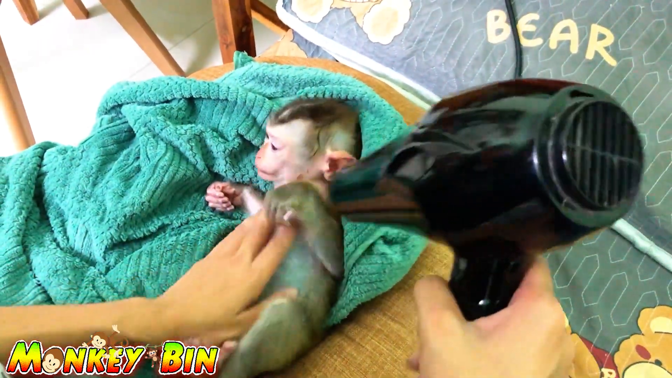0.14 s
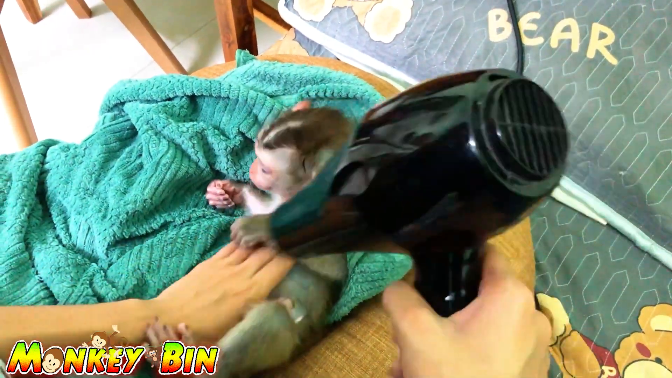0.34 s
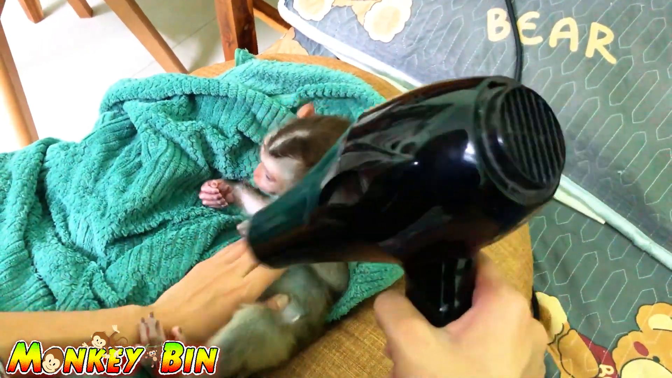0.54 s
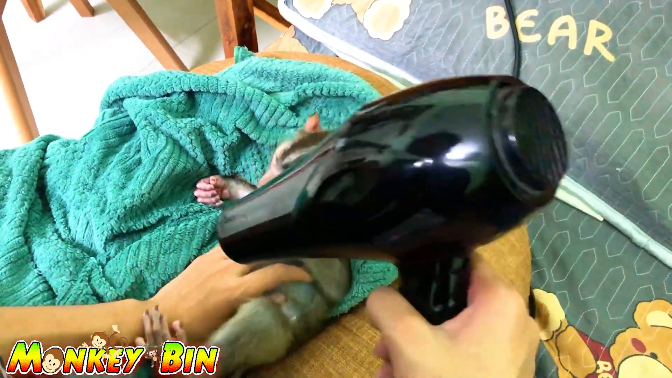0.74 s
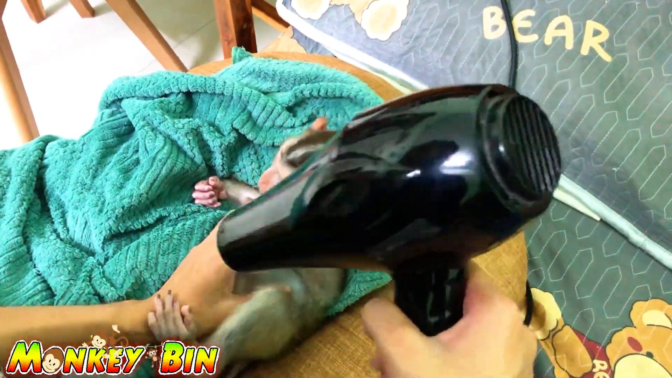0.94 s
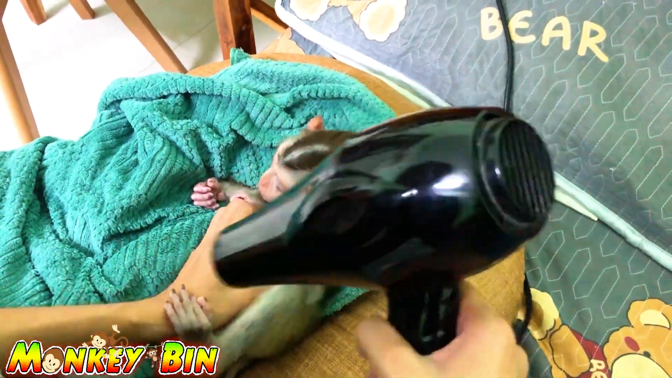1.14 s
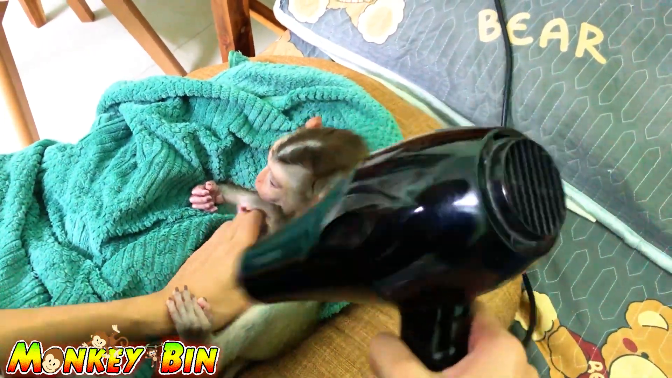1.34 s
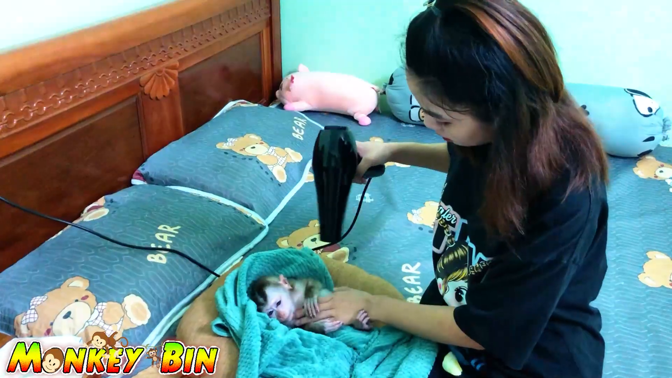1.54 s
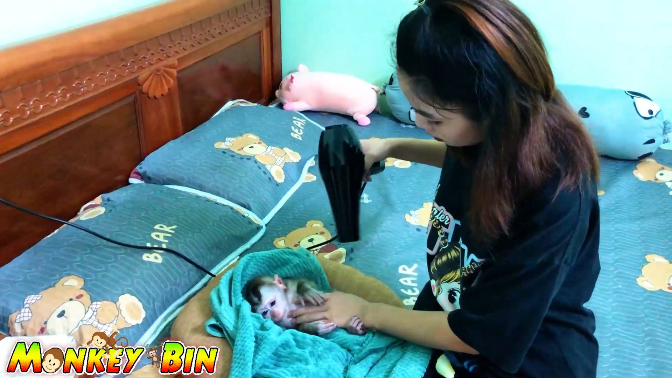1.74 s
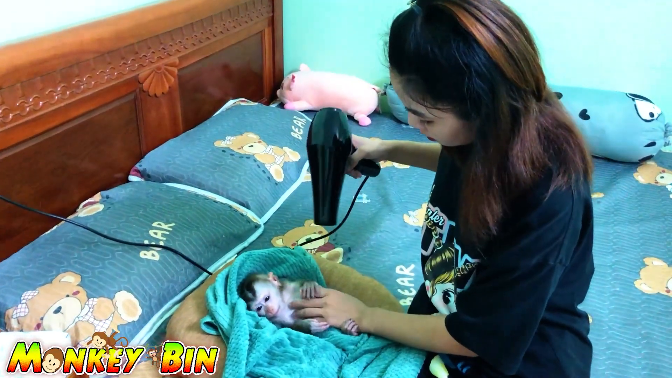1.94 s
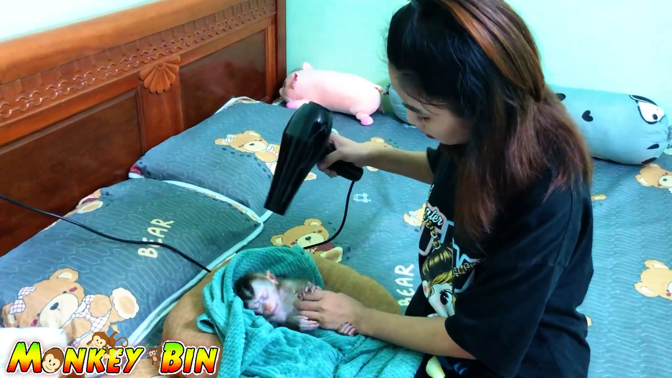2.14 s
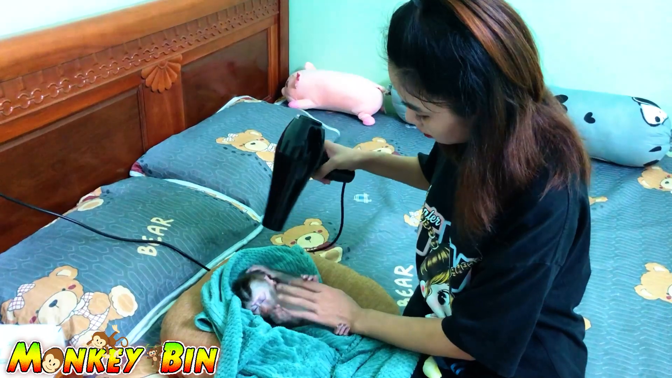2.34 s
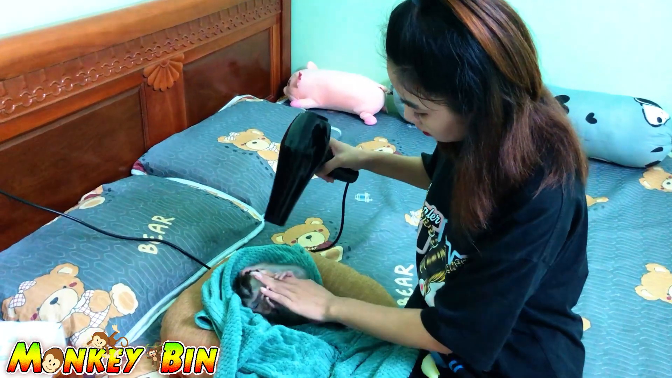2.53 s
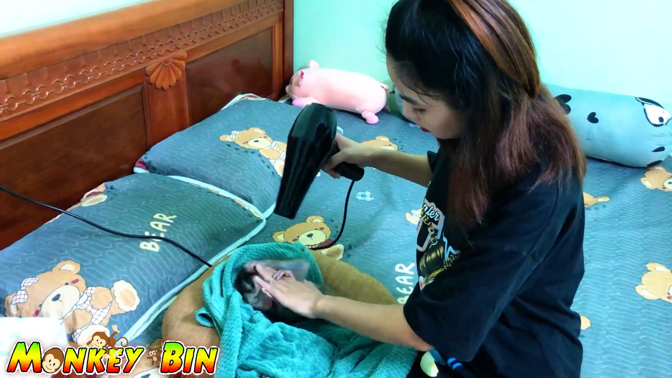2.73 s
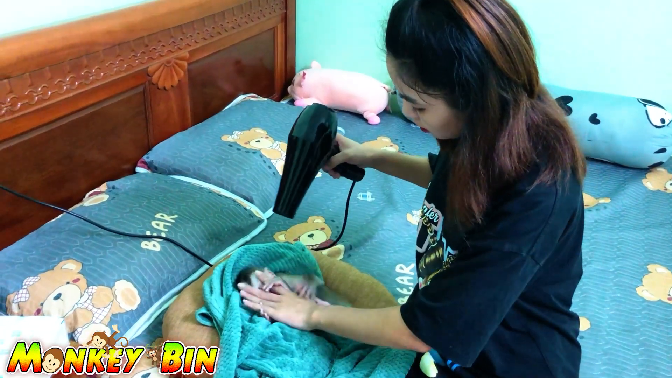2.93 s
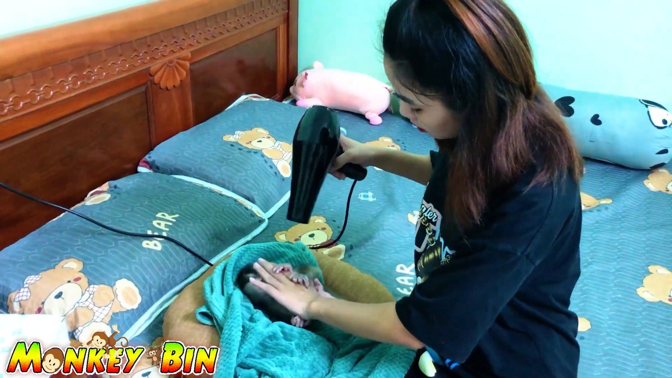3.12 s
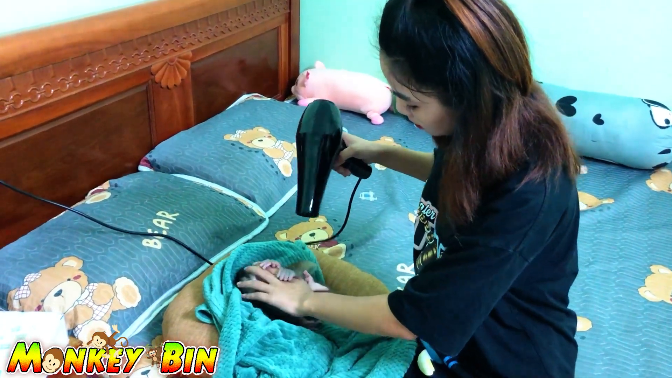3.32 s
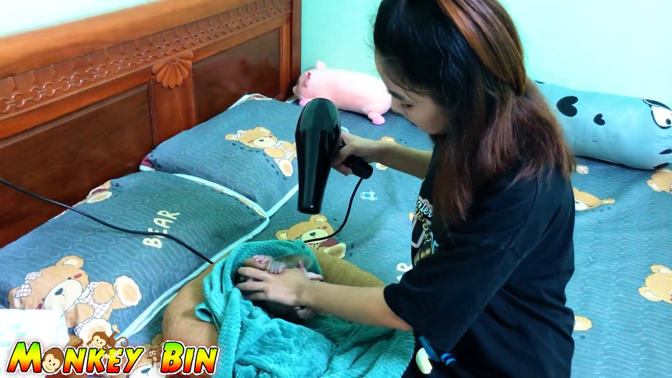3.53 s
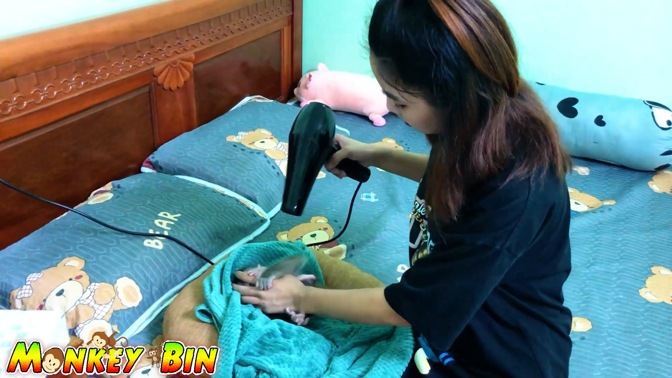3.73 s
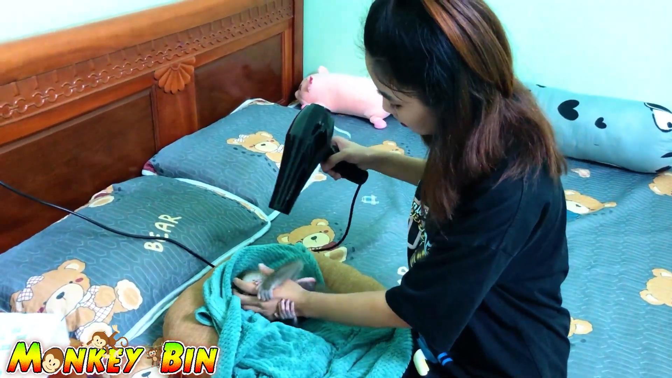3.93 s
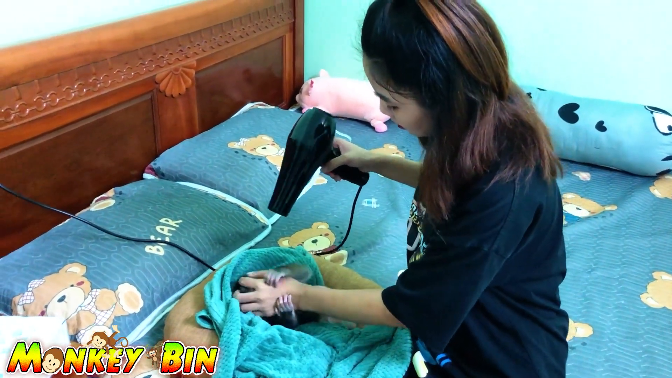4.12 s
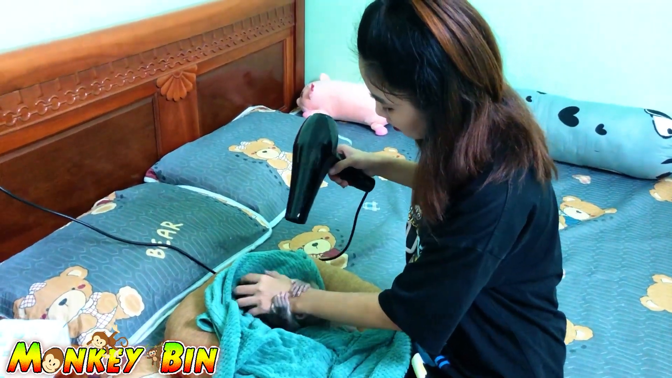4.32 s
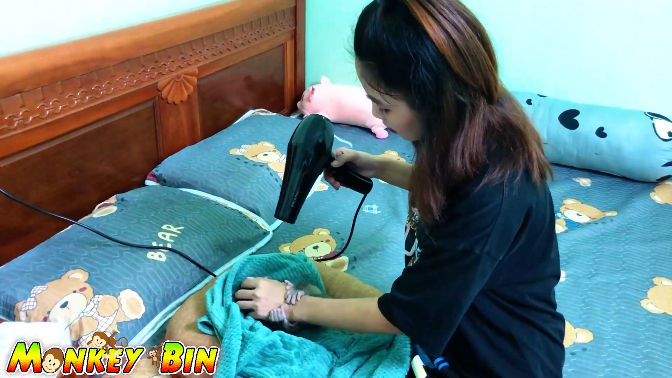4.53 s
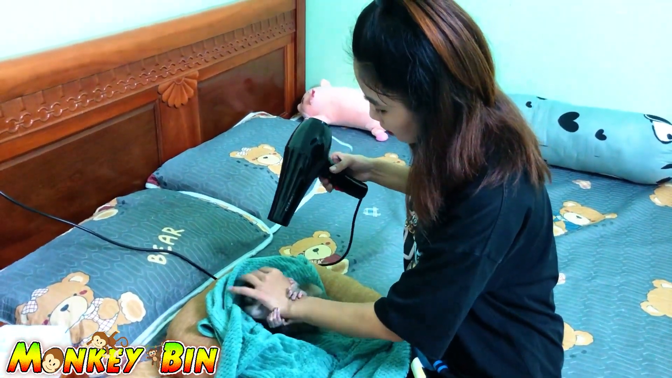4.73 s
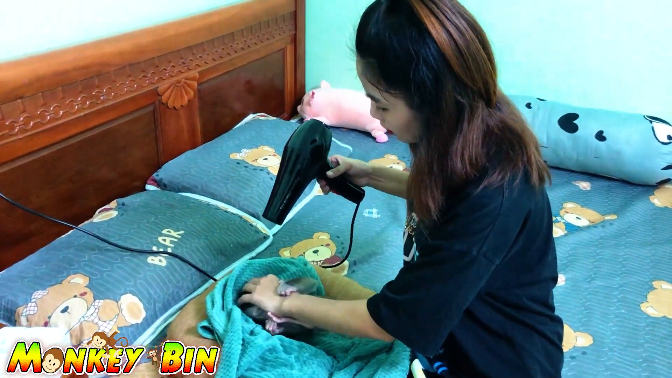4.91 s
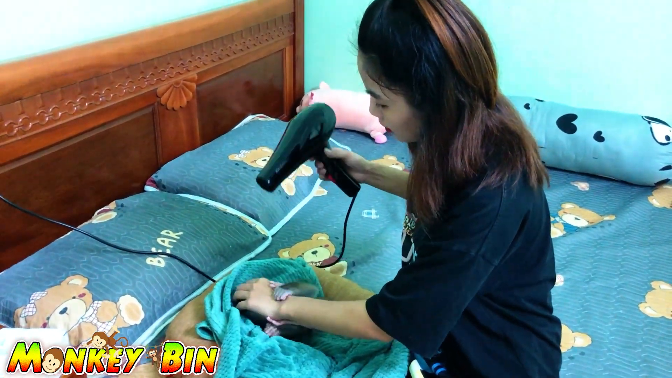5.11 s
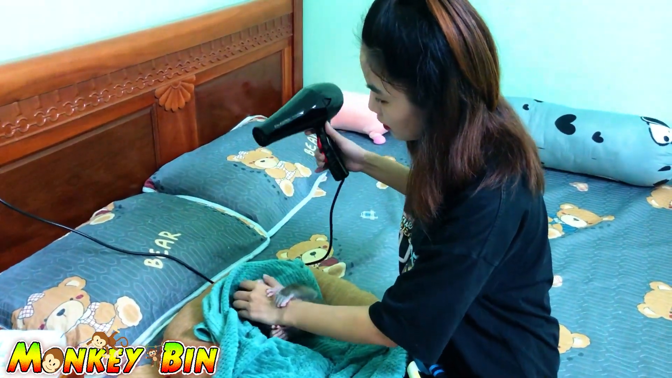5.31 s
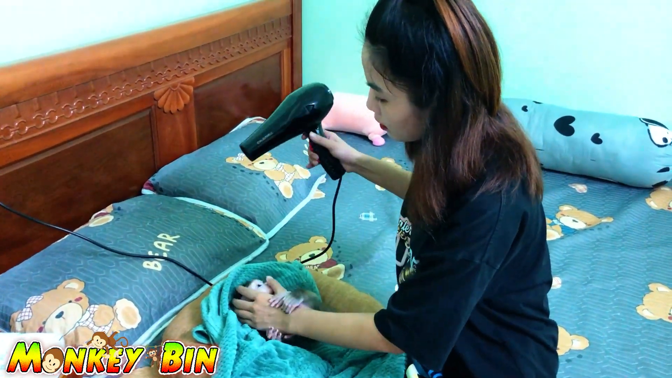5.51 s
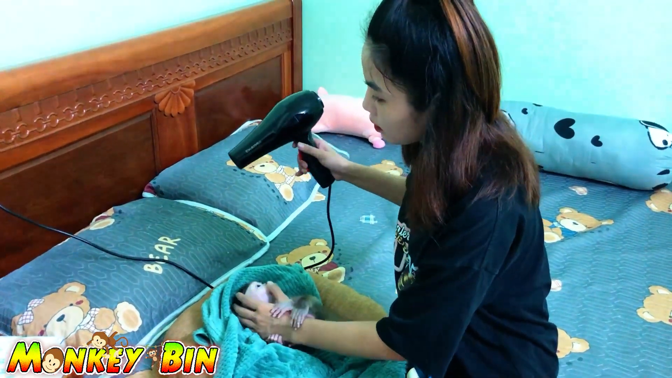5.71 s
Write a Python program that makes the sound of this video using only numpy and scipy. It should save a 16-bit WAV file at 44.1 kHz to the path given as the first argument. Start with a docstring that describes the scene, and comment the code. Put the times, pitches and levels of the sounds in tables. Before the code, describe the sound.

Rushing air from a hair dryer fills a small bedroom, with a slight wavering whine underneath. The microphone starts right beside the dryer, then suddenly sits farther away, where the tone is roomier. After almost five seconds the fan coasts down, falling in pitch and fading. Fingers shift softly on the plastic handle, and a switch clicks sharply once, ringing briefly in the quiet room.

```python
"""The rush of a handheld hair dryer fills a bedroom, close by its intake, then abruptly from across the bed.
Turbulent air rings the barrel over a faint fan whine, both swelling and dipping.
The power is cut: the fan coasts down, its whine sags and the hiss dies first.
Fingers slide on the plastic handle; short bursts of hiss and one sharp switch snap ring in the room."""
import sys
import numpy as np
from scipy import signal
from scipy.fft import rfft, irfft
from scipy.io import wavfile
from scipy.ndimage import uniform_filter1d

SR = 44100
rng = np.random.default_rng(int(sys.argv[2]) if len(sys.argv) > 2 else 0)


def wav_record(signal):
    """Record a signal, one row per channel, as 16-bit PCM in the file named by sys.argv[1]."""
    frames = np.transpose(np.atleast_2d(signal))
    bounded = np.clip(frames, -1, 1)
    # unit amplitude maps onto the largest positive 16-bit level
    quanta = np.round(bounded * 32767).astype(np.int16)
    wavfile.write(sys.argv[1], SR, quanta)


N = 254016
T = np.arange(N) / SR
FREQ = np.maximum(np.fft.rfftfreq(N, 1 / SR), 1)


def undb(db):
    """Decibels to gain."""
    return 10 ** (np.asarray(db) / 20)


def unit(x):
    """Scale to rms 1."""
    return x / np.sqrt(np.mean(x ** 2))


def slope(points):
    """Join (Hz, value) points on a log-frequency axis."""
    hz, value = np.transpose(points)
    return np.interp(np.log(FREQ), np.log(hz), value)


def bumps(modes):
    """Response in dB of a set of resonances and notches."""
    return sum(db / (1 + (2 * (FREQ - hz) / width) ** 2) for hz, width, db in modes)


def noise(db):
    """Noise of rms 1, coloured by a response in dB."""
    return unit(irfft(rfft(rng.standard_normal(N)) * undb(db), N))


def split(x, centres):
    """Overlapping bands round the centres that add up to x."""
    spectrum = rfft(x)
    return [irfft(spectrum * slope(list(zip(centres, row))), N) for row in np.eye(len(centres))]


def walk(rate_hz):
    """Slow random wander of rms 1."""
    return noise(-20 * np.log10(1 + (FREQ / rate_hz) ** 2))


def swell(x, db, hz, width_hz):
    """Ride one band of x up or down by a moving number of dB."""
    band = irfft(rfft(x) / (1 + (2 * (FREQ - hz) / width_hz) ** 4), N)
    return x + band * (undb(db) - 1)


def fan_speed(off_s=4.729, half_speed_s=0.5):
    """Share of full speed: air drag brakes the fan once the power is cut."""
    return 1 / (1 + np.maximum(T - off_s, 0) / half_speed_s)


def level_rides(far):
    """Rides in dB for whine, whistle, rumble and hiss: a base for each place, with swells and dips."""
    # Brief swells and dips. Each row: middle and half length in seconds, then the change
    # in dB of fan whine, barrel whistle, jet rumble and nozzle hiss.
    swells = [(0.03, 0.08, 7.5, 2, 1, -.5), (0.167, 0.018, 2, -10, 2, 0), (0.51, 0.074, 1.5, 4, 1.5, 0),
              (0.724, 0.067, 11, 4.5, 0, 0), (0.985, 0.33, -9, -3.5, 1.5, 1),
              (1.147, 0.06, -18, 5.5, -5, .5), (1.398, 0.062, 6, 4, 0, 1),
              (1.695, 0.12, 8.5, -15, -1.5, -0.5), (1.917, .04, 7, -5, 1.5, 1),
              (2.296, 0.3, 4.5, 1.5, 0.5, 0.5), (3.332, 0.032, 6, 5.5, 1, -1.5),
              (3.55, .07, 0, 3, -1.5, 0.5), (3.82, 0.082, 1, 6.5, 0, 4), (4.148, 0.16, 5, 3.5, -2, 2),
              (4.624, 0.071, 6, 3, -2.5, 1)]
    waver = walk(rate_hz=8.9)
    whine_db = -39.5 * (1 - far) - 43 * far + 0.5 * waver
    whistle_db = (1 - far) - 2.7 * far - 0.1 * waver
    rumble_db = -0.5 * waver
    nozzle_db = 1.5 * far
    swell_db = sum(np.outer(change_db, np.exp(-((T - s) / half_s) ** 2))
                   for s, half_s, *change_db in swells)
    return np.array([whine_db, whistle_db, rumble_db, nozzle_db]) + swell_db


def ripple(depth_db, centre_hz=1500, count=14):
    """Response in dB of bed and wall reflections: a midrange comb that motion blurs in the treble."""
    lags_s = rng.uniform(0.003033, .03, (count, 1))
    comb = unit(np.cos(2 * np.pi * FREQ * lags_s).sum(axis=0))
    return depth_db * comb * np.exp(-np.log(FREQ / centre_hz) ** 2)


def steady(x, hold_s=0.064, share=0.58):
    """Even out slow swells of a noise: a fan at constant speed delivers constant power."""
    power = uniform_filter1d(x ** 2, int(hold_s * SR))
    return unit(x / power ** (share / 2))


def barrel_rush(far):
    """Turbulence rings the barrel and the room, with one colour for each listening place."""
    # Colour of the air beside the intake and across the bed. Each row: frequency in Hz, level in dB.
    near_air = [(30, -42), (60, -19), (100, -18), (160, -8), (250, -4.5), (480, 4), (800, 2), (1050, -5),
                (2400, -8), (4200, -11.5), (5200, -17.5), (7500, -13.5), (11000, -22), (15500, -33)]
    far_air = [(30, -38), (60, -31), (90, -15), (190, -12), (250, -5.5), (500, 2.5), (800, 0.5), (1150, -5),
               (2400, -10.5), (4200, -14.5), (5200, -19.5), (7500, -18.5), (9500, -21.5), (15500, -38.5)]
    # Resonances of barrel and grille, then the room's standing waves at each place.
    # Each row: centre in Hz, width in Hz, lift in dB.
    barrel_modes = [(545, 108, 5), (1372, 129, 10), (2037, 110, 5.5), (2350, 140, -1), (2680, 105, 4),
                    (3430, 140, 2.5), (3730, 350, -2), (4510, 170, 1.5), (6340, 430, 1)]
    near_modes = [(160, 14, 5), (193, 23, -4), (243, 40, 4.5), (381, 20, -6), (408, 21, 5), (437, 27, -4.5),
                  (522, 18, -4.5), (593, 35, 1), (623, 25, -6), (670, 54, 2.5)]
    far_modes = [(120, 10, -3.5), (151, 31, 2.5), (247.6, 31, 4), (354, 14, -10), (380.7, 30, 7),
                 (439, 25, -10), (470, 44, 4), (523, 19, -6.5), (571, 21, -7), (593, 19, 8), (740, 33, 1.5),
                 (802, 33, -3.5), (843, 24, 6), (904, 13, 2.5), (920, 26, -7), (980, 30, 3), (1070, 30, 2),
                 (1620, 22, 1.5), (1940, 24, 6), (2050, 44, 2)]
    barrel = bumps(barrel_modes)
    beside = steady(noise(slope(near_air) + barrel + bumps(near_modes) + ripple(depth_db=1.2)))
    across = steady(noise(slope(far_air) + barrel + bumps(far_modes) + ripple(depth_db=2.0)))
    return np.sqrt(1 - far) * undb(-32.5) * beside + np.sqrt(far) * undb(-31.5) * across


def shimmer(air, gain=0.13, travel_s=.00009, count=4):
    """Short reflections off hand and bedding shift as the dryer moves, so the hiss shimmers."""
    lags_s = rng.uniform(0.001197, .005, count)
    treble = split(air, [1500, 2800])[1]
    return air + gain * sum(np.interp(T - lag - travel_s * walk(1.0), T, treble) for lag in lags_s)


def standing_waves(air):
    """A room resonance swells or fades as the dryer passes its antinode or node."""
    # Each row is one pass: middle and half length in seconds, centre and width in Hz, lift in dB.
    passes = [(0.998, .2, 850, 70, -10), (3.687, .07, 593, 40, 7.5), (4.024, .25, 855, 34, 6.5),
              (4.573, .05, 593, 41.4, 4.5), (4.897, 0.17, 589, 24, 5.5), (5.22, .15, 645, 40, 7),
              (5.27, 0.18, 408, 70, -6), (5.14, 0.13, 335, 70, 4)]
    for s, half_s, hz, width_hz, db in passes:
        air = swell(air, db * np.exp(-((T - s) / half_s) ** 2), hz, width_hz)
    return air


def airflow(speed, far, whistle_db, rumble_db, nozzle_db, flutter_db=0.53):
    """Rushing air: hiss, whistle and rumble swell and dip; the treble dies first as the fan slows."""
    # How the air fades with the fan. Each row: band centre in Hz, exponent of speed in the band's gain.
    speed_law = [(100, 2.5), (330, 3.45), (580, 4.5), (2000, 4.9), (7000, 6.5), (15000, 8.8)]
    air = shimmer(barrel_rush(far))
    air = swell(air, nozzle_db, hz=6300, width_hz=1000)
    air = swell(air, whistle_db, hz=1374, width_hz=140)
    air = swell(air, rumble_db, hz=203, width_hz=240)  # the jet hitting a towel
    air = standing_waves(air)
    centres, exponents = np.transpose(speed_law)
    return sum(band * speed ** exponent * undb(flutter_db * walk(11.5))
               for band, exponent in zip(split(air, centres), exponents))


def fan_whine(speed, level_db, shaft_hz=275.7, wobble=0.00509, flicker_db=2.5, speed_exponent=4.2):
    """Tones locked to the wavering shaft sag as the fan slows and flare when they cross a resonance."""
    # The fan's tones, blade tone first. Each row: multiple of the shaft rate, relative level in dB.
    fan_tones = [(2, -0.5), (3, -10.5), (4, -19.5), (5, -16.5), (7, -13)]
    # A peak and a notch the falling tones sweep through. Each row: centre and width in Hz, lift in dB.
    coast_peaks = [(575, 75, 19.5), (377, 50, -9)]
    turning_hz = shaft_hz * speed * (1 + wobble * walk(8.4))
    phase = 2 * np.pi * np.cumsum(turning_hz) / SR
    lift_db = bumps(coast_peaks)
    tones = 0
    for multiple, db in fan_tones:
        full_hz = multiple * shaft_hz
        crossing_db = np.interp(full_hz * speed, FREQ, lift_db) - np.interp(full_hz, FREQ, lift_db)
        ride_db = level_db if multiple == 2 else np.mean(level_db)  # only the blade tone takes the ride
        gain = undb(ride_db + db + crossing_db + flicker_db * walk(10.0))
        tones = tones + np.sqrt(2) * np.sin(multiple * phase) * gain
    return tones * speed ** speed_exponent


def room_tone(level_db=-73):
    """A faint, steady bed of low noise."""
    # Colour of the quiet room. Each row: frequency in Hz, relative level in dB.
    colour = [(25, -20), (60, 1), (150, 5), (400, -16), (900, -17), (2500, -9), (8500, -15), (13000, -19),
              (15500, -24)]
    return undb(level_db) * noise(slope(colour))


def grip(start_s=5.166, attack_s=.002, fade_s=0.068, level_db=-65):
    """Fingers slide briefly on the plastic as the grip shifts."""
    # Colour of the slide. Each row: frequency in Hz, relative level in dB.
    colour = [(600, -22), (2500, 10.5), (6000, -7), (13000, -12), (15500, -16)]
    age = np.maximum(T - start_s, 0)
    envelope = (1 - np.exp(-age / attack_s)) * np.exp(-age / fade_s)
    return undb(level_db) * envelope * noise(slope(colour))


def hiss_bursts():
    """Short bursts of hiss; the last two lead straight into the snap."""
    # Each row is one burst: start in seconds, level in dB, fade time in milliseconds.
    bursts = [(5.166, -57, 3), (5.178, -56, 2.6), (5.434, -67, 2), (5.445, -62, 2), (5.4535, -55, 2.5),
              (5.479, -51, 2.5), (5.4843, -49, 2)]
    # Colour of the bursts. Each row: frequency in Hz, relative level in dB.
    colour = [(600, -14), (1700, 0), (3000, 5), (4500, 1), (6200, 0), (9500, -6), (13000, -10),
              (15500, -15)]
    envelope = sum(undb(db) * (T >= s) * np.exp(-np.maximum(T - s, 0) * 1000 / fade_ms)
                   for s, db, fade_ms in bursts)
    return envelope * noise(slope(colour))


def room_tail(build_s=0.0034):
    """The small room's answer to a click: reflections build up quickly, and the treble dies first."""
    # Colour of the echo. Each row: frequency in Hz, relative level in dB.
    colour = [(150, -9), (450, -7), (560, 11), (820, 7), (1020, 1), (1700, -2.5), (2200, 4), (3000, -2),
              (5000, -1.5), (10000, 2), (13000, 1), (14000, -8), (15500, -10)]
    # Casing resonances that tint the echo. Each row: centre in Hz, width in Hz, lift in dB.
    casing_modes = [(1640, 130, 9.5), (2160, 250, -1), (6230, 470, 1), (7450, 560, -8), (8150, 500, 2),
                    (9300, 400, -2), (10400, 500, 2), (11500, 500, -3), (12400, 500, 2)]
    # The room's decay. Each row: band centre in Hz, seconds to fall by 60 dB.
    decays = [(300, 0.47), (2000, 0.44), (7000, 0.41), (13000, 0.32)]
    centres, t60s = np.transpose(decays)
    bands = split(noise(slope(colour) + bumps(casing_modes)), centres)
    tail = sum(band * np.exp(-np.log(1000) * T / t60) for band, t60 in zip(bands, t60s))
    return tail * (1 - np.exp(-T / build_s))


def switch_blows():
    """The switch tips over and snaps home: two pulses of force, the longer contact the duller."""
    # Each row is one contact: time in seconds, strength in dB, contact length in milliseconds.
    contacts = [(5.4877, -10.5, 0.062), (5.4884, -1, 0.027)]
    blows = np.zeros(N)
    for s, db, contact_ms in contacts:
        offset_ms = (T - int(s * SR) / SR) * 1000
        push = np.exp(-8 * (offset_ms / contact_ms) ** 2)
        blows += undb(db) * push / push.sum()
    return blows


def handle_ring(radiate_hz=1200):
    """Struck plastic rings briefly, too small to radiate much bass; nearby surfaces throw it back."""
    # Modes of switch and handle. Each row: frequency in Hz, level in dB, seconds to fall by 60 dB.
    modes = [(570, -22, .06), (1630, -28, .025), (2340, -22, .01), (3200, -24, .005), (4540, -21, 0.0045),
             (6130, -12, 0.0056), (6700, -10, 0.0046), (8500, 5.5, 0.0021), (9700, -2, 0.0022),
             (12360, -9, 0.0043), (14500, -10, .0025)]
    # Slaps off bed and headboard. Each row: delay in seconds, relative level in dB.
    slaps = [(.0015, -20), (.0063, -20), (.0139, -19)]
    t = T[:SR // 10]
    ring = sum(undb(db) * np.cos(2 * np.pi * hz * t) * np.exp(-np.log(1000) * t / t60)
               for hz, db, t60 in modes)
    ring = signal.sosfilt(signal.butter(2, radiate_hz, "high", fs=SR, output="sos"), ring)
    return ring + sum(undb(db) * np.interp(t - int(delay_s * SR) / SR, t, ring, left=0)
                      for delay_s, db in slaps)


def switch(snap_gain_db=-22, snap_send_db=-39.5, burst_send_db=-31):
    """Bursts of hiss come first, then the snap rings the handle; both echo in the room."""
    tail = room_tail()
    bursts = hiss_bursts()
    blows = switch_blows()
    snap = undb(snap_gain_db) * signal.fftconvolve(blows, handle_ring())[:N]
    room_send = undb(snap_send_db) * blows + undb(burst_send_db) * bursts
    return snap + bursts + signal.fftconvolve(room_send, tail)[:N]


def scene(move_s=1.52, crossfade_s=0.011):
    """Dryer, hand, switch and room tone, the same in both ears."""
    speed = fan_speed()
    far = np.clip((T - move_s) / crossfade_s, 0, 1)  # 0 beside the intake, 1 across the bed
    whine_db, whistle_db, rumble_db, nozzle_db = level_rides(far)
    dryer = airflow(speed, far, whistle_db, rumble_db, nozzle_db) + fan_whine(speed, whine_db)
    mono = dryer + grip() + switch() + room_tone()
    return np.array([mono, mono])


def record(dry, top_hz=15750):
    """A steep low-pass trims the very top of the hiss."""
    return signal.sosfilt(signal.ellip(10, .1, 80, top_hz, fs=SR, output="sos"), dry)


dry = scene()
out = record(dry)
wav_record(out)
```